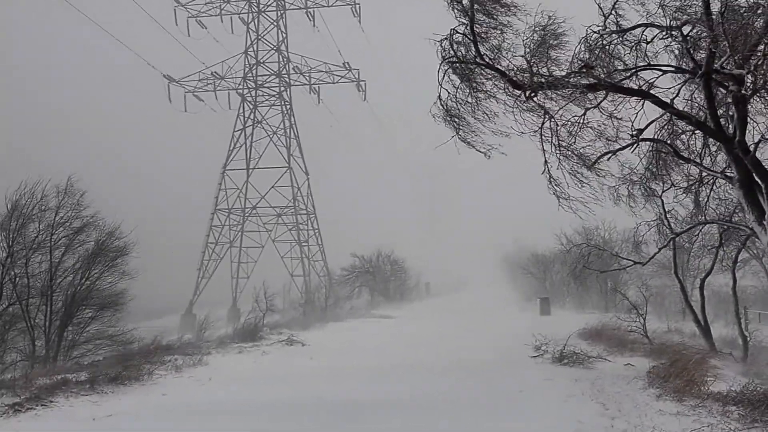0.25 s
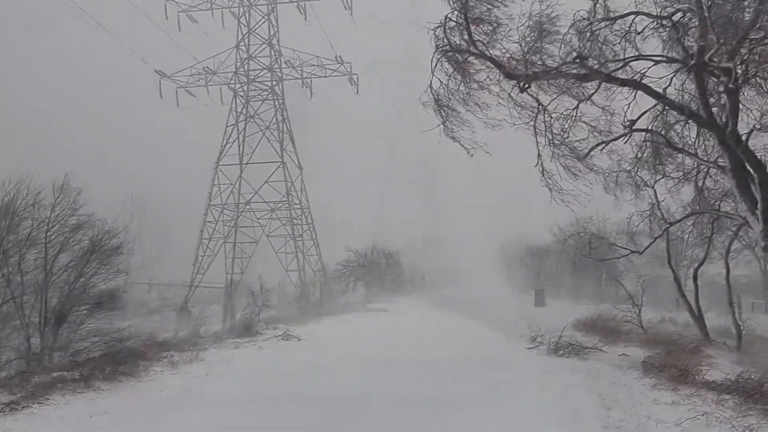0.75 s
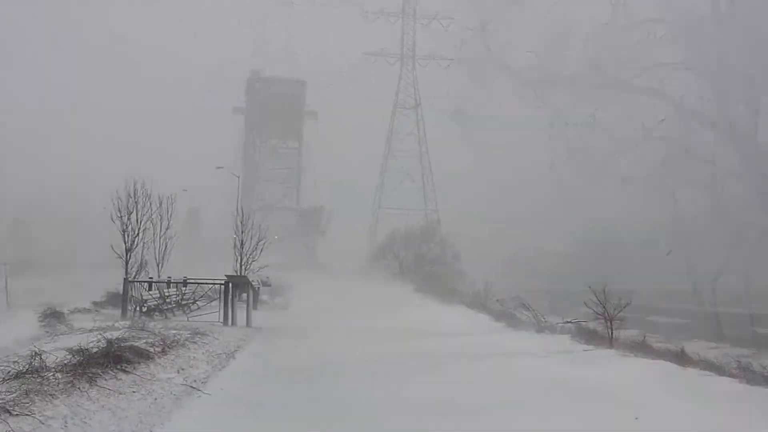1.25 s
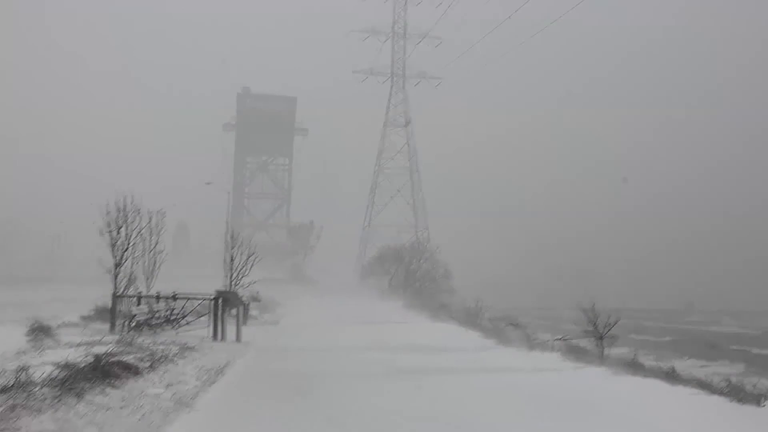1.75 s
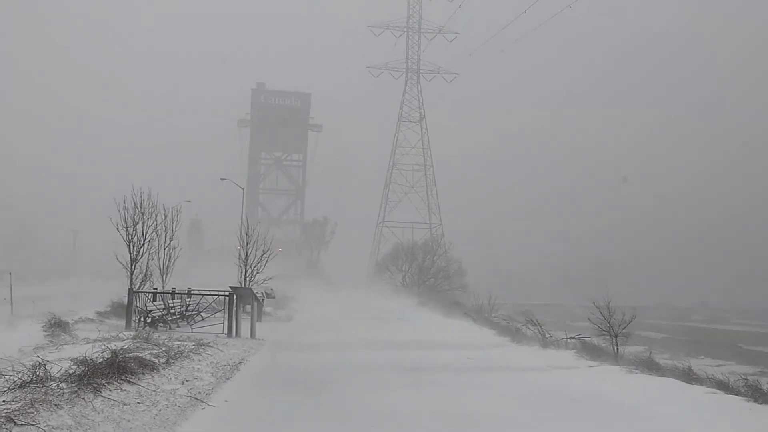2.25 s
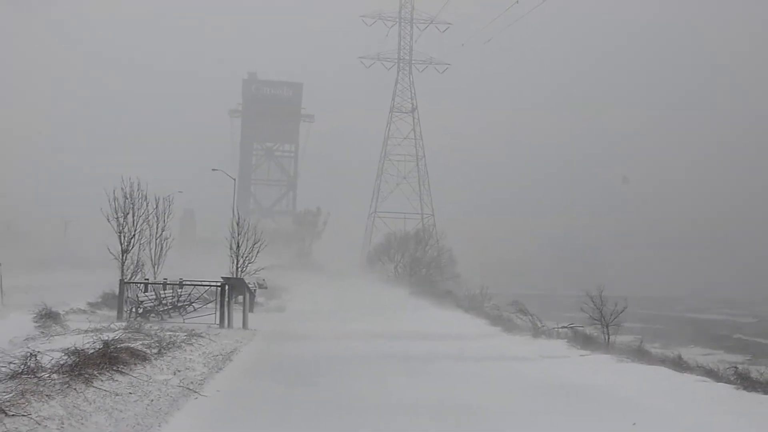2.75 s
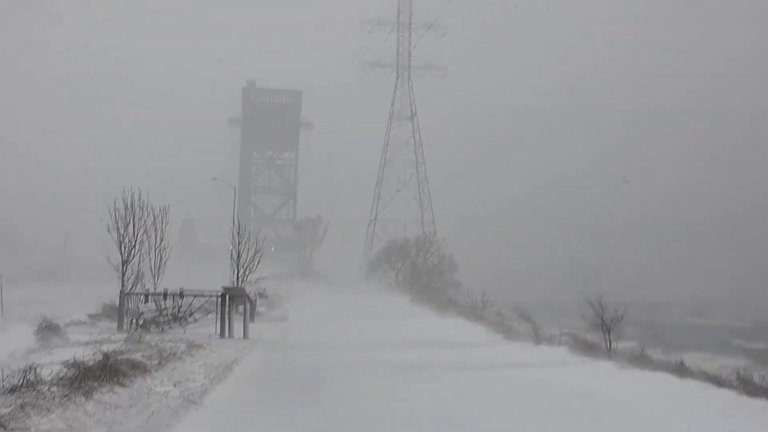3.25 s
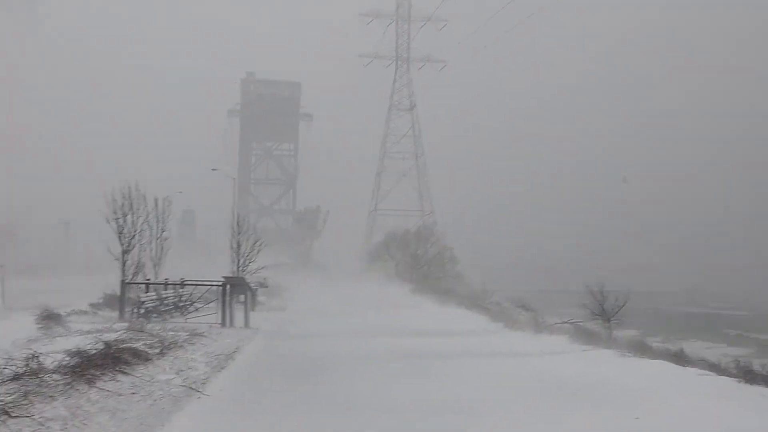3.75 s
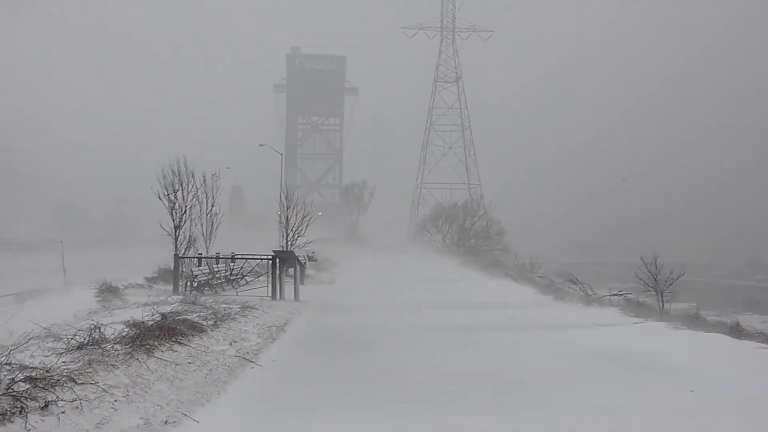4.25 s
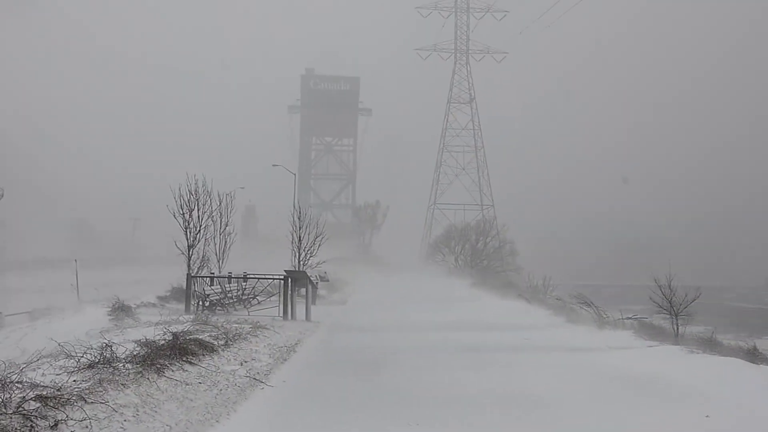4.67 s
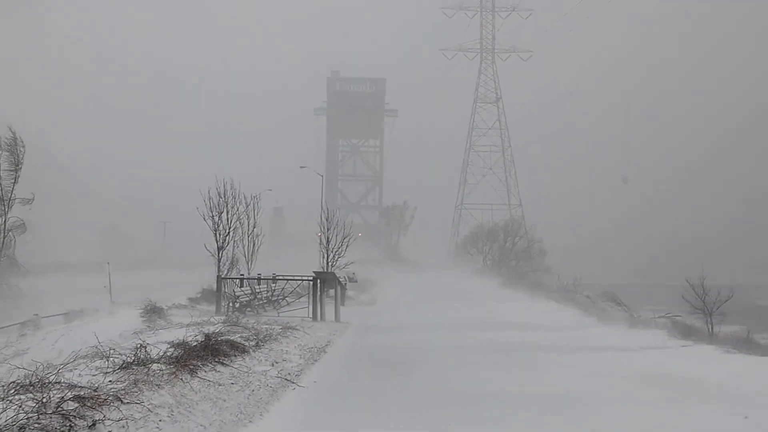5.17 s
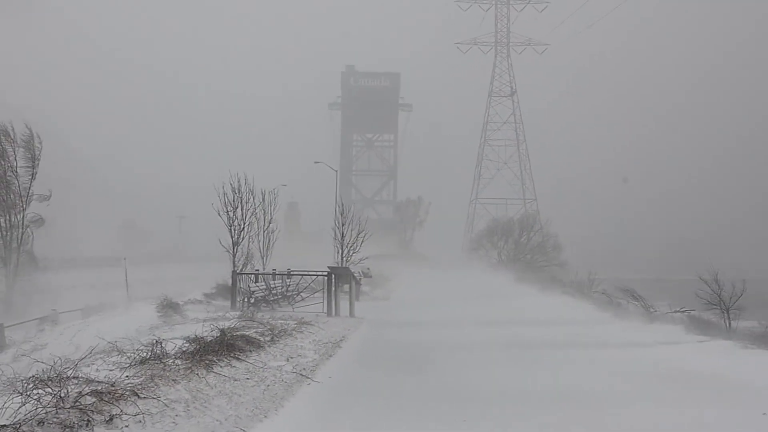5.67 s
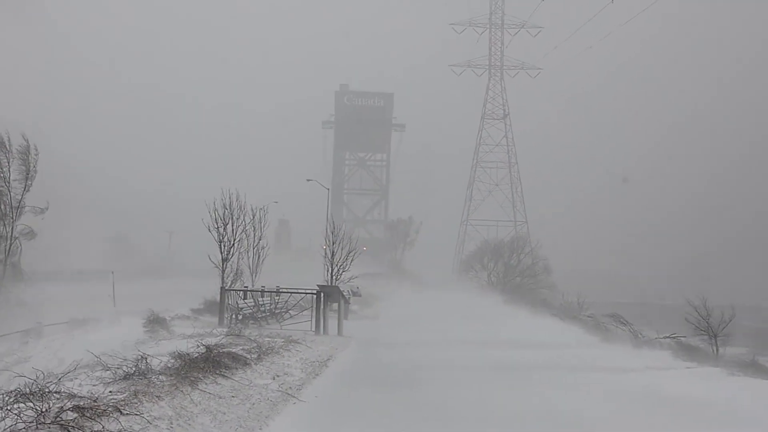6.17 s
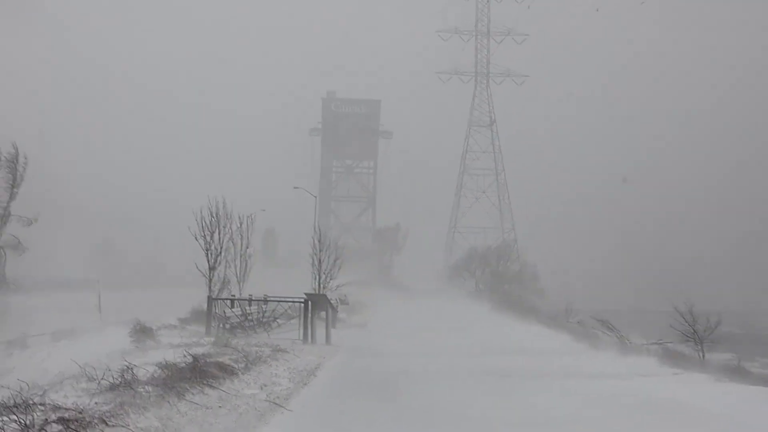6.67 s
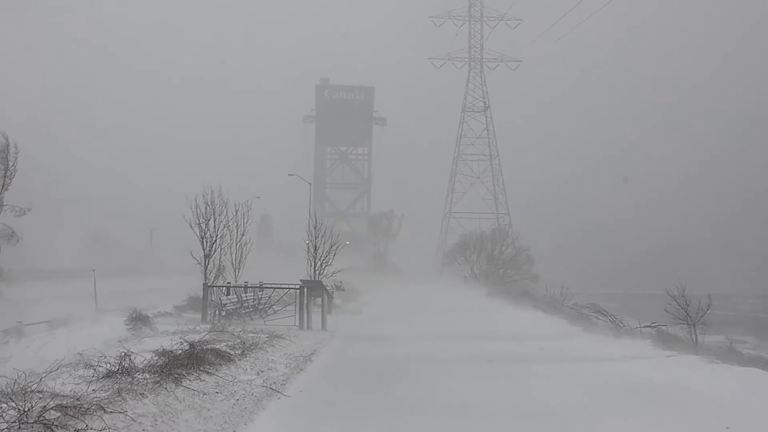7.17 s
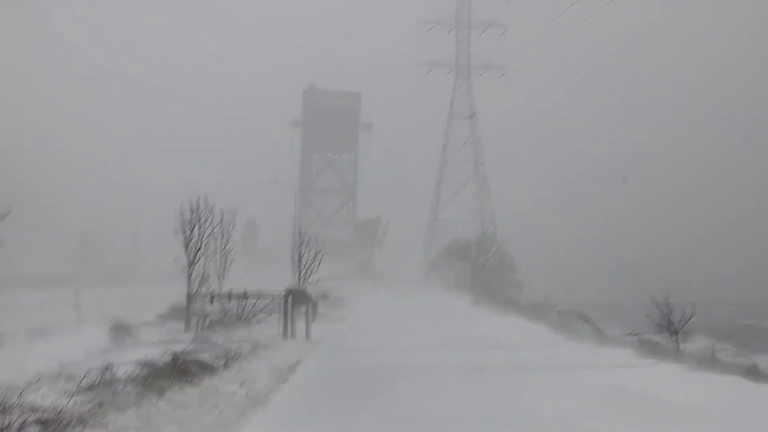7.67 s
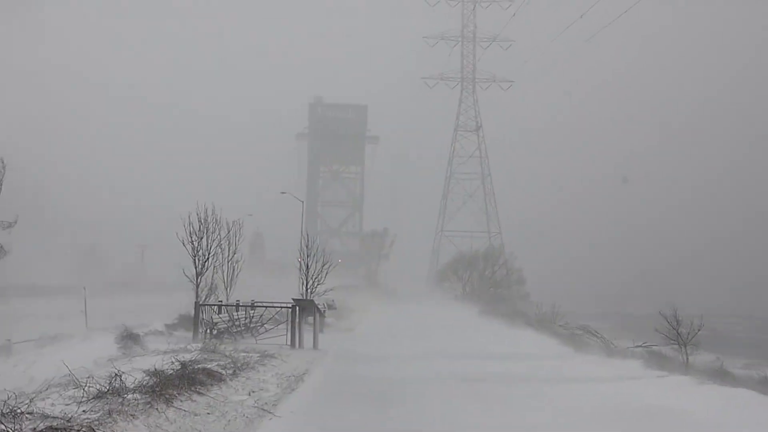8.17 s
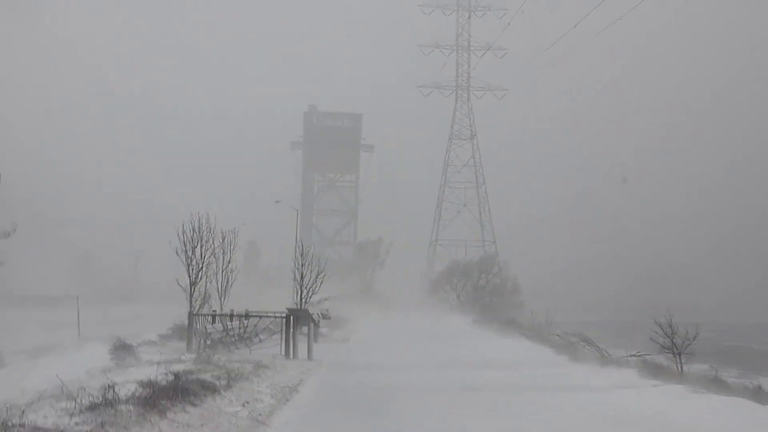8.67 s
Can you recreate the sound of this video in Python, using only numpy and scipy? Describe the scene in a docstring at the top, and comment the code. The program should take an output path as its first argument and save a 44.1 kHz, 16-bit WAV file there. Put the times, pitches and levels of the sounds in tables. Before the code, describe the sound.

A blizzard on an exposed shore batters the microphone with a deep, fluttering rumble from start to finish. Gusts land as quick, low slaps, the hardest slightly distorted, and shift unevenly between left and right. A softer rush of air and a fine snow hiss swell and fade on top, dotted with thin, close clicks of icy grains striking the microphone body.

```python
"""Blizzard on a microphone

Wind over an open shore blows straight onto a handheld pair of microphone ports. Turbulent eddies
buffet them with a low roar that pushes left and right apart, and air rushes past the body. Driven
snow hisses and ticks on the casing in flurries, and the loudest swings overload the input."""
import sys
import numpy as np
from scipy import signal
from scipy.io import wavfile

SR = 44100
rng = np.random.default_rng(int(sys.argv[2]) if len(sys.argv) > 2 else 0)


def store_pcm(level_fs):
    """Save levels as 16-bit WAV."""
    pcm = np.round(np.clip(level_fs, -1, 1) * 32767).astype(np.int16)
    wavfile.write(sys.argv[1], SR, np.atleast_2d(pcm).T)


N = 392931

# The wind at the ports. Each row: time in seconds, level in dB, bass tilt in dB per octave, lift of
# the roar's upper edge in dB, heave relative to the level in dB, left minus right in dB.
PORT_WIND = [(0, -16.5, -1, -2, -0.5, 4), (.3, -17, 1, 2, -7.5, 7), (.55, -17, -1, -0.5, -8, 4.5),
             (.75, -15.5, 0.5, -0.5, -6, 2.5), (1.1, -16, 1, 5, -19, 3), (1.6, -17.5, 0, 0.5, -17, 3),
             (2.2, -14.5, 1, -0.5, -24, 2.5), (2.8, -16.5, 1.5, 3, -18, 6.5), (3.3, -18, 1.5, 2, -13, 2),
             (3.43, -15, 0.5, 1.5, -8, 1), (3.65, -15.5, -0.5, 1, -13, 3),
             (3.9, -19.5, -4.5, -1.5, -13, 3.5), (4.15, -14, 0, -3, -20, 2.5),
             (4.4, -14, 1.5, -7.5, -26, 6.5), (4.9, -15, 1.5, -1.5, -27, 3.5),
             (5.4, -15.5, 0, -3.5, -20, 4), (5.75, -16.5, 2.5, 2, -19, 3.5), (6.1, -19, 2.5, 8, -9, 7),
             (6.7, -15, 2, 1, -15, 3), (7.2, -13.5, 1.5, 0, -29, 3.5), (7.55, -15.5, 1, 2.5, -8, 2.5),
             (7.78, -18.5, -0.5, 2, -13, 3.5), (7.95, -15.5, 0, -0.5, -24, 5),
             (8.1, -13, -0.5, -4.5, -29, 5), (8.55, -13.5, -1.5, -5.5, -20, 2.5),
             (8.91, -17, -4, -2.5, -24, 1.5)]
# Surges and lulls. Each row: centre in seconds, length in seconds, left rise in dB, right rise in dB.
ROAR_SURGES = [(0.135, 0.031, -2, 0.5), (0.18, 0.06, -4.5, -2.0), (0.264, 0.031, -2.5, -2),
               (0.429, 0.022, -6, -3.5), (0.474, 0.03, 2, 0), (0.524, 0.03, 2, 0), (0.768, 0.041, 4, -4.5),
               (1.003, 0.03, -2, -6), (1.112, 0.03, -5, -4), (1.162, 0.047, -4, -5.5),
               (1.232, 0.028, -0.5, 6), (1.377, 0.023, -4, 6), (1.432, 0.034, 3, 0), (1.581, 0.025, 6, 5),
               (1.656, 0.036, 0.5, 0), (1.761, 0.025, -1, 6), (1.936, 0.061, 3, 4.5), (2.1, 0.036, 0, 2),
               (2.23, 0.04, 1.5, -2), (2.614, 0.055, -3, -0.5), (2.893, 0.027, 0, 0), (3.048, 0.024, 2, -1),
               (3.168, 0.03, -2, 2), (3.213, 0.024, 1.5, 0), (3.312, 0.068, -0.5, 0.5),
               (3.392, 0.046, -5, 1.5), (3.437, 0.02, 4, -5.5), (3.637, 0.011, -1.5, 5),
               (3.876, 0.057, 1.5, -2.5), (3.941, 0.056, 3.5, 2), (4.006, 0.034, -2, 1),
               (4.225, 0.037, -3, 3.5), (4.33, 0.053, -1, 7.5), (4.425, 0.054, 1.5, 4),
               (4.51, 0.018, -1, 4), (4.754, 0.024, 0, 8), (4.824, 0.036, -1, 2.5), (5.063, 0.03, 1, 1.5),
               (5.582, 0.021, -8, -10), (5.747, 0.025, 3.5, -1), (5.827, 0.031, 2.5, -7),
               (6.261, 0.041, 0, -1), (6.385, 0.042, 2, 6), (6.43, 0.023, 3, 2), (6.61, 0.015, -8, -4),
               (6.859, 0.038, 2.5, 0), (7.004, 0.092, -2, -3.5), (7.273, 0.13, 0.5, 1),
               (7.358, 0.039, -3, -5), (7.418, 0.022, -2, -13), (7.578, 0.07, -2.5, -5.5),
               (7.643, 0.039, -2.5, -7), (7.762, 0.029, 0, 5.5), (7.827, 0.064, 4, 4),
               (7.992, 0.041, -2, 4), (8.156, 0.04, -1.5, 2), (8.231, 0.041, -4, 2.5),
               (8.311, 0.064, -3.5, -1), (8.66, 0.036, 1, 0), (8.875, 0.057, -2.5, -2)]
# Each row: frequency in Hz, spectral density of the roar in dB.
ROAR_SPECTRUM = [(35, -47), (60, -14), (100, -2), (150, -1), (280, -3.5), (450, -10), (800, -26.5),
                 (1400, -42.5), (2400, -54.5)]
# Each row: frequency in Hz, added left minus right of the roar in dB.
ROAR_BALANCE = [(30, 13), (120, 2), (300, -2), (700, -2), (1400, -10.5)]

def buffeting(lumpy_db=1.27, heave_band_hz=(22, 57.5)):
    """Turbulent pressure: eddies strike each port in lumps, and the largest heave below the roar."""
    level_db, bass_tilt, edge_db, heave_db, pan_db = in_time(PORT_WIND)
    surge_db = swells(ROAR_SURGES)
    level_db = level_db + surge_db - 0.06 * drift(16)
    heave_db = heave_db + 1.5 * drift(2.4)
    lumps = from_db(lumpy_db * np.array([drift(33), drift(31)]))
    edge_db = edge_db + 0.28 * surge_db.mean(axis=0) + drift(28)   # surges spread upward in frequency
    roar = 0
    for hz, pair in noise_bands(ROAR_SPECTRUM):
        tilt_db = bass_tilt * np.log2(170 / hz) + edge_db / (1 + (330 / hz) ** 4)   # big, small eddies
        balance = sides(at_hz(ROAR_BALANCE, hz))[:, None]
        roar += pair * balance * from_db(tilt_db + 0.69 * drift(9.1))
    roar = sides(pan_db) * unit_rms(roar * lumps)
    left, right = butterworth(rng.standard_normal((2, N)), heave_band_hz, "band")
    heave = sides(8)[:, None] * [left, right - 0.7 * left]   # a push on one port pulls on the other
    return from_db(level_db) * (roar + from_db(heave_db) * unit_rms(heave))

# Each row: start in seconds, level in dB, pitch in Hz, left minus right in dB.
AIR_SLAPS = [(.772, -9, 65, 3), (1.042, -9, 121, 5), (1.192, -13, 250, 1), (1.267, -1, 250, 4),
             (1.316, -4, 170, 5), (1.372, -2.5, 223, 4), (1.415, -11, 170, 3), (1.581, -3, 334, 3),
             (1.637, -5, 150, 5), (1.751, -6, 200, -1), (1.828, -15, 153, 5), (2.164, -4, 167, 5),
             (2.447, -5, 350, 5), (2.661, -8, 139, 4), (2.818, -12, 129, 4), (2.917, -2, 140, 5),
             (3.097, -13, 121, 8), (3.433, -4, 300, 3), (3.498, -7, 200, 3), (3.635, -3, 220, 4),
             (4.3, -2, 283, 0), (4.379, -6, 132, 5), (4.517, -6, 140, 4), (4.764, -8, 145, -1),
             (4.931, -8, 116, 11), (5.104, -21, 400, 0), (5.139, -4.5, 110, 6), (5.065, -9, 150, 0),
             (5.2, -1.5, 180, -1), (5.355, -7, 200, 3), (5.401, -5, 140, 3), (5.555, -13, 110, 0),
             (5.589, -7, 102, 7), (5.655, -4, 150, 4), (5.72, -4.5, 140, 3), (5.742, -7.5, 110, 4),
             (5.845, -3, 150, 4), (5.789, -9, 145, 7), (5.943, -13, 156, 0), (6.09, -7, 129, 15),
             (6.194, -8, 164, 6), (6.696, -17, 180, 2), (7.186, -7, 215, 4), (7.685, -9, 116, 5),
             (7.732, -5, 120, 0), (7.747, -3, 121, 1), (7.763, -4, 335, -3), (7.818, -7, 188, 5),
             (7.889, -9, 450, -4), (8.629, -6, 240, 2)]

def slaps(cycles=2.56):
    """Pressure transients: a sharp push of air on the ports swings back and dies in a few cycles."""
    out, t = np.zeros((2, N)), np.arange(2500) / SR
    for start, level_db, hz, pan_db in AIR_SLAPS:
        push = np.sin(2 * np.pi * hz * t) * from_db(-60 * (t * hz / cycles) ** 2)
        place(out, push, start, level_db, pan_db)
    return out

# Each row: frequency in Hz, spectral density of the rush in dB.
RUSH_SPECTRUM = [(400, -8), (700, 8), (1100, 5), (1600, 3), (2500, -5.5), (4000, -14), (7000, -28),
                 (12000, -93)]

def rush(level_db, patchy_db=1.17, rasp_db=1.5):
    """Flow noise: air tearing past the body makes a broad sound whose bands partly swell together."""
    shared_swell = drift(22)
    noise = sum(pair * from_db(patchy_db * (shared_swell + 0.42 * drift(29)))
                for _, pair in noise_bands(RUSH_SPECTRUM))
    rasp = from_db(rasp_db * drift(140))
    return from_db(level_db) * unit_rms(noise * rasp)

# Each row: frequency in Hz, band gain of the snow's ticks and hiss in dB.
SNOW_SPECTRUM = [(900, 0), (2200, 3), (3500, -1), (5000, 0.5), (7000, -6.5), (10000, -9.5), (12000, -38),
                 (15000, -47)]

def snow(level_db, treble_tilt, flakes_per_s=1500, spread_db=3, hiss_db=1, soft_hz=8500):
    """Shot noise: clumps of flakes, many faint and a few hard, each ring briefly over a fine hiss."""
    hits = rng.random(N) < flakes_per_s * from_db(3.5 * np.tanh(drift(25))) / SR
    sizes = from_db(spread_db * np.minimum(rng.exponential(1, N), 2.6)) * rng.choice([-1, 1], N)
    strikes = hits * sizes * sides(rng.normal(0, 10.6, N))
    polarity_draw, pitch_index = rng.random(N), rng.integers(0, 16, N)
    ticks = 0
    for k, hz in enumerate(np.geomspace(1200, 12000, 16)):
        # the lower the correlation, the more flakes move the ports in opposite senses
        in_phase = polarity_draw < (1 + at_hz(PORT_CORRELATION, hz)) / 2
        polarity = np.array([np.ones(N), np.where(in_phase, 1, -1)])
        rings = butterworth(strikes * polarity * (pitch_index == k), [hz / 1.25, hz * 1.25], "band")
        band_db = at_hz(SNOW_SPECTRUM, hz) + treble_tilt * np.log2(hz / 4500)
        ticks += rings * from_db(band_db + 2.1 * drift(32))
    ticks = butterworth(ticks, soft_hz, "low")   # snow is a soft contact
    hiss = sum(pair * from_db(treble_tilt * np.log2(hz / 4500) + 2.2 * np.tanh(drift(14)))
               for hz, pair in noise_bands(SNOW_SPECTRUM))
    flutter = from_db(1.9 * np.tanh(drift(27)) + 2.26 * np.tanh(drift(52)))
    patter = unit_rms(ticks) + from_db(hiss_db) * unit_rms(hiss)
    return from_db(level_db) * unit_rms(flutter * patter)

# The flow between flurries. Each row: time in seconds, rush in dB, snow in dB, treble tilt of the
# snow in dB per octave, left minus right in dB.
BODY_FLOW = [(0.0, -31.5, -41, 4, 3), (0.27, -29, -41, -3, 3), (0.77, -28, -41.5, -2, 0),
             (1.27, -32.5, -42, -0.5, -1), (1.44, -30, -45, 0, -3.5), (1.54, -31, -42.5, -1, -3),
             (2.31, -33, -41.5, 0, -2.5), (3.2, -32, -45, -0.5, -2.5), (3.4, -24, -43.5, -2, -3),
             (3.65, -33.5, -40.5, -1.5, -2.5), (3.85, -30.5, -38.5, -1, -1.5), (4.17, -31, -40, -2, -2.5),
             (4.52, -32.5, -40.5, -1.5, -2.5), (5.93, -32.5, -42.5, -1, -2.5), (6.38, -30, -41, -1, -3),
             (7.45, -34.5, -45, -0.5, -2.5), (7.79, -31.5, -42, -1, -2.5), (8.22, -38.5, -43.5, -1.5, -1.5),
             (8.59, -34, -43.5, -1, -1.5), (8.91, -40, -42, -2, 0)]
# Flurries and lulls. Each row: centre in seconds, length in seconds, snow rise in dB, rush rise in dB.
SNOW_FLURRIES = [(.1, 0.19, -2, 3), (0.282, 0.11, 7.5, 4.5), (.335, .04, 0, -1.5), (.6, .06, 2, 2),
                 (.7, 0.072, 6, 2), (0.83, 0.062, 7.5, 1.5), (.91, 0.066, 6, 1), (1.03, 0.034, 5, 3.5),
                 (1.22, 0.1, 9, 5), (1.275, 0.033, 7, 4.5), (1.32, 0.049, 3, -4), (1.39, 0.068, 7, -1),
                 (1.48, 0.037, 8.5, -1.5), (1.575, 0.059, 9, 0.5), (1.74, 0.059, 7.5, -3),
                 (1.99, .12, 1, 1.5), (2.475, 0.055, 0.5, 0.5), (2.654, 0.042, 4, 5.5),
                 (2.986, 0.054, -0.5, 2.5), (3.177, 0.049, 10, 0), (3.27, 0.068, 9, -1),
                 (3.315, 0.03, 6, -0.5), (3.355, 0.028, 12, -2.5), (3.42, 0.046, 14.5, -1.5),
                 (3.48, 0.036, 9, -2.5), (3.562, 0.098, 9, 1.5), (3.79, 0.094, 7.5, 1.5),
                 (4.14, 0.022, 10.5, 1), (4.26, 0.094, 7.5, 1), (4.913, 0.13, 3, 3.5), (4.45, 0.072, -1, 0),
                 (5.13, 0.08, -4, 0.5), (5.36, 0.048, 3.5, -0.5), (5.5, 0.086, 0, -1), (5.66, 0.13, 4, 3.5),
                 (5.81, 0.045, 6.5, 3.5), (6.13, 0.1, 3, 3), (6.3, 0.12, -4, 1.5), (6.44, 0.087, 3, 0),
                 (6.56, .05, 1, 0.5), (6.655, 0.054, 2, 1), (6.74, 0.068, 2, 1.5), (6.84, 0.15, 4.5, 3.5),
                 (7.0, 0.064, -0.5, -2), (7.218, 0.19, 6, 3.5), (7.682, 0.023, 6, 0),
                 (7.75, 0.043, 7.5, 2.5), (7.81, 0.063, 6.5, 2), (7.91, 0.03, 2, 1.5), (8.144, 0.081, 3, 5),
                 (8.3, .1, -2, 2.5), (8.435, 0.18, 4, 2.5), (8.707, 0.065, 6.5, 2.5)]

def flurries():
    """Advection: air carries the snow, so both share a side. Returns the sound and snow rise in dB."""
    rush_db, snow_db, treble_tilt, pan_db = in_time(BODY_FLOW)
    snow_rise_db, rush_rise_db = swells(SNOW_FLURRIES)
    air = rush(rush_db + rush_rise_db)
    flakes = snow(snow_db + snow_rise_db, treble_tilt - 0.5 * drift(7.5))
    return sides(pan_db) * (air + flakes), snow_rise_db

# Each row: start in seconds, level in dB, ring frequency in Hz, left minus right in dB.
PELLET_HITS = [(0.0176, -23.0, 2900.0, 11.0), (0.0585, -14, 4000.0, 3.0), (0.0961, -17, 3400.0, 1),
               (0.1151, -15, 3900.0, -3.0), (0.1637, -28, 3000.0, 5), (0.1894, -18.0, 3100.0, 7.0),
               (0.224, -20, 3000.0, 6.0), (0.2526, -15, 3400.0, 4.0), (0.2671, -18, 3500.0, 10.0),
               (0.2852, -19, 3400.0, 3.0), (0.2934, -14, 3800.0, -2.0), (0.3179, -16, 3100.0, 6.0),
               (0.3265, -15, 3700.0, -3), (0.3455, -18.0, 3600.0, 3.0), (0.3873, -16, 3500.0, -1),
               (.4853, -22, 5200, -2), (.6804, -18, 5200, -1), (0.557, -11.5, 3500.0, 6.0),
               (0.5877, -11, 4100.0, 0.0), (0.6108, -17, 3500.0, -5), (0.8175, -21, 4100.0, -17),
               (0.8235, -20, 3700.0, 3), (0.8471, -20, 3100.0, 4.0), (0.8893, -22, 3000.0, 6.0),
               (0.9646, -21, 3400.0, -6), (1.0174, -12, 3500.0, -2.0), (1.0774, -22, 4000.0, -7.0),
               (1.1513, -15.5, 4500, 0), (1.1857, -23, 4500, 4), (1.2271, -13, 5200, -1),
               (1.3902, -18, 4900, 2), (1.6841, -21, 5200, -3), (1.2644, -16, 3700.0, -5.0),
               (1.4771, -24, 3600.0, -3.0), (1.5555, -20, 3400.0, -8.0), (1.5664, -25, 3500.0, -8.0),
               (1.581, -14, 3600.0, 7.0), (1.7151, -23, 3800.0, -1), (1.7251, -21.0, 4200.0, 3.0),
               (1.78, -21, 3500.0, 4.0), (1.9514, -20, 3800.0, -8), (2.009, -16, 3800.0, 2),
               (2.0695, -20, 3700.0, -5), (2.3875, -29, 4900, 1), (2.4467, -21.0, 4300.0, -1),
               (2.6453, -18, 4100.0, -3.0), (2.6535, -18, 3500.0, 2.0), (2.7814, -21, 3400.0, -9.0),
               (2.9873, -18, 4500.0, 6), (3.1814, -23, 4000.0, -1), (3.2576, -15, 3300.0, 1.0),
               (3.31, -5.5, 4200.0, 7.0), (3.3519, -12.0, 3800.0, -5), (3.403, -8, 3800.0, -4.0),
               (3.417, -4.5, 4000.0, 4), (3.484, -14, 4200.0, 6.0), (3.5164, -14, 5200, -3),
               (3.5843, -15, 6300, 0), (3.572, -15, 4100.0, -7.0), (3.6346, -12, 3800.0, 4.0),
               (3.7319, -18, 4100.0, -7.0), (3.7759, -18, 4400.0, -2), (3.8016, -12, 3800.0, -4.0),
               (3.81, -19, 4000.0, 0.0), (4.0861, -19, 3400.0, -6.0), (4.1337, -19, 4200.0, 2.0),
               (4.1442, -13, 5300.0, 6), (4.165, -17, 4000.0, -7.0), (4.1946, -17, 3600.0, -4.0),
               (4.2326, -17, 3300.0, -2.0), (4.2653, -13, 4200.0, 3.0), (4.3283, -22, 3300.0, -5),
               (4.341, -19.0, 4100.0, -3.0), (4.359, -14, 4900, 6), (4.6478, -19, 4900, -5),
               (4.8279, -26, 5000, -9), (4.8853, -24, 5000, -2), (4.7065, -22.0, 3600.0, -9),
               (4.7696, -19, 3600.0, 8), (4.7759, -22.0, 3700.0, -7.0), (5.0521, -20, 3600.0, -8.0),
               (5.2888, -20, 3400.0, -7.0), (5.4453, -15.5, 3400.0, -7), (5.804, -21.0, 3300.0, -4.0),
               (5.8585, -22, 3700.0, -3), (5.9541, -23, 3900.0, -8), (6.0013, -19, 3800.0, -9),
               (6.1274, -17, 4700.0, 1), (6.1437, -19.0, 3900.0, 2), (6.1754, -15.5, 3500.0, -8.0),
               (6.2027, -24, 3400.0, -7), (6.2861, -19, 3300.0, -1), (6.495, -13, 4000.0, 1),
               (6.6467, -15, 4000.0, -5), (6.6639, -21.0, 3600.0, 1.0), (6.7106, -13, 4400.0, -1.0),
               (6.7426, -16, 3600.0, -4.0), (6.7963, -21, 3600.0, -8.0), (6.8421, -26, 3200.0, -5),
               (6.8768, -18, 5000, 2), (6.891, -14.5, 4500, 0), (7.1333, -18, 3300.0, -4.0),
               (7.238, -20, 3700.0, -8.0), (7.5593, -17, 4100.0, 3), (7.6843, -19, 3900.0, 0.0),
               (7.8133, -21, 3600.0, -14), (7.895, -17, 3700.0, 1.0), (8.038, -23, 5000, 2),
               (8.073, -19, 3280, 2), (8.4366, -12, 3800.0, 4), (8.6888, -16, 3500.0, 3.0),
               (8.7106, -20, 3400.0, -5.0)]

def pellets(cycles=6, knock_hz=1800, soft_hz=7370):
    """Impact excitation: each snow pellet cracks, rings for a few cycles and knocks the casing dully."""
    out, t = np.zeros((2, N)), np.arange(400) / SR
    bursts = rng.standard_normal((len(PELLET_HITS), len(t))) * np.exp(-t / 0.00086)
    cracks = 0.26 * butterworth(bursts, 1000, "high")
    knock = 0.25 * np.sin(2 * np.pi * knock_hz * t) * np.exp(-t / 0.00067)
    for (start, level_db, hz, pan_db), crack in zip(PELLET_HITS, cracks):
        modes = np.sin(2 * np.pi * hz * t) + 0.27 * np.sin(2 * np.pi * 1.23 * hz * t)
        ring = modes * from_db(-60 * t * hz / cycles)
        place(out, ring + crack + knock, start, level_db, pan_db)
    return butterworth(out, soft_hz, "low", order=4)   # the soft contact dulls the top

def ice_grains(rise_db, grains_per_s=40, base_db=-35, spread_db=2, band_hz=(3000, 9000)):
    """Poisson impacts: sparse hard grains make thin clicks, denser and louder in the flurries."""
    hits = rng.random(N) < grains_per_s * from_db(rise_db) / SR
    size_db = base_db + 0.4 * rise_db + spread_db * np.minimum(rng.exponential(1, N), 3)
    clicks = hits * from_db(size_db) * rng.choice([-1, 1], N)
    return butterworth(clicks * sides(rng.normal(0, 7.2, N)), band_hz, "band", order=3)

# Each row: frequency in Hz, correlation of left and right from -1 to 1.
PORT_CORRELATION = [(60, -0.39), (99, -0.64), (160, -0.46), (270, -0.5), (450, -0.44), (740, 0.026),
                    (1220, 0.62), (2010, 0.68), (3330, 0.48), (5500, 0.76), (9080, -0.48), (13000, -0.5)]
# Each row: frequency in Hz, phase lead of the right port in radians.
PORT_PHASE = [(30, -0.3), (65, 0.38), (100, 0.57), (250, 0.7), (400, 0.3), (1000, 0.57), (1500, 0.34),
              (2200, 0.75), (3200, 0.0), (5000, -0.28), (7000, -1.0)]

def noise_bands(spectrum):
    """Partial coherence: yield centre Hz and a partly correlated noise pair for each third octave."""
    white = rng.standard_normal((2, 2, N))
    low_hz, high_hz = spectrum[0][0], spectrum[-1][0]
    edges = np.geomspace(low_hz, high_hz, round(3 * np.log2(high_hz / low_hz)) + 1)
    for k, (low, high) in enumerate(zip(edges, edges[1:])):
        mid, side = butterworth(white[k % 2], [low, high], "band")
        hz = np.sqrt(low * high)
        wander = 0.076 * drift(6)   # as the flow turns
        correlation = np.tanh(np.arctanh(at_hz(PORT_CORRELATION, hz)) + wander)
        left, right = np.sqrt(1 + correlation) * mid + np.sqrt(1 - correlation) * side * [[1], [-1]]
        lead = round(at_hz(PORT_PHASE, hz) / (2 * np.pi * hz) * SR)
        left = np.pad(left, (max(lead, 0), 0))[:N]
        right = np.pad(right, (max(-lead, 0), 0))[:N]
        yield hz, from_db(at_hz(spectrum, hz)) * np.array([left, right])

def drift(hz):
    """Random modulation: noise of rms 1 through a double one-pole low-pass at hz."""
    step, run_in = 40, 2000
    pole = np.exp(-2 * np.pi * hz * step / SR)
    noise = rng.standard_normal(N // step + run_in + 2)
    slow = signal.lfilter([1], [1, -2 * pole, pole * pole], noise)[run_in:]
    return np.interp(np.arange(N) / step, np.arange(len(slow)), unit_rms(slow))

def swells(events):
    """Gaussian envelopes in dB, summed for each column of rises; length is the width at half height."""
    t = np.arange(N) / SR
    return sum(np.outer(rises_db, np.exp(-np.log(16) * ((t - centre) / length) ** 2))
               for centre, length, *rises_db in events)

def in_time(rows):
    """Linear interpolation of each column to one value per sample."""
    times, *columns = np.transpose(rows)
    return [np.interp(np.arange(N) / SR, times, column) for column in columns]

def at_hz(points, hz):
    """Interpolation on a log-frequency axis."""
    frequencies, values = np.transpose(points)
    return np.interp(np.log(hz), np.log(frequencies), values)

def from_db(db):
    """Decibels to gain."""
    return 10 ** (np.asarray(db) / 20)

def unit_rms(x):
    """Normalisation: the mean of the channels gets rms 1."""
    return x / np.sqrt(np.mean(np.mean(np.atleast_2d(x), axis=0) ** 2) + 1e-20)

def sides(pan_db):
    """Left and right gains for a level difference."""
    return from_db(np.multiply.outer([.5, -.5], pan_db))

def butterworth(x, hz, kind, order=2):
    """Maximally flat filtering."""
    return signal.sosfilt(signal.butter(order, hz, kind, fs=SR, output="sos"), x + 1e-18)

def place(out, sound, start, level_db, pan_db):
    """Superposition: add a panned sound at start seconds."""
    at = round(start * SR)
    out[:, at:at + len(sound)] += from_db(level_db) * np.outer(sides(pan_db), sound)[:, :N - at]

def scene():
    """Superposition: the pressures of wind, snow and ice add at the ports."""
    snowy_air, snow_rise_db = flurries()
    return buffeting() + slaps() + snowy_air + ice_grains(snow_rise_db) + pellets()

# Narrow dips in the microphone's treble. Each row: centre in Hz, width in Hz, depth from 0 to 1.
TREBLE_DIPS = [(5694, 640, 0.79), (6920, 260, 0.68)]

def record(dry, knee=18, ceiling=0.985, cutoff_hz=15725):
    """Filtering and saturation: treble dips, bass roll-off, short-kneed overload, a steep top cut."""
    for hz, width_hz, depth in TREBLE_DIPS:
        dry = dry - depth * signal.lfilter(*signal.iirpeak(hz, hz / width_hz, fs=SR), dry)
    dry = butterworth(dry, 30, "high")
    overloaded = dry / (1 + np.abs(dry / ceiling) ** knee) ** (1 / knee)
    top_cut = signal.cheby2(20, 50, cutoff_hz, fs=SR, output="sos")
    return np.clip(signal.sosfilt(top_cut, overloaded), -1, 1)

dry = scene()
out = record(dry)
store_pcm(out)
```